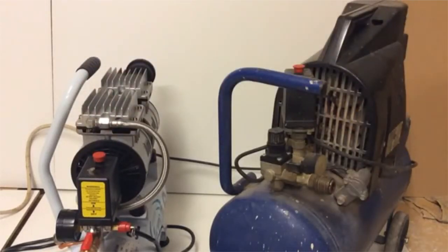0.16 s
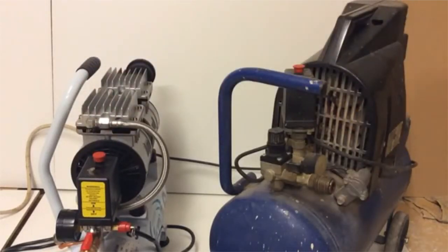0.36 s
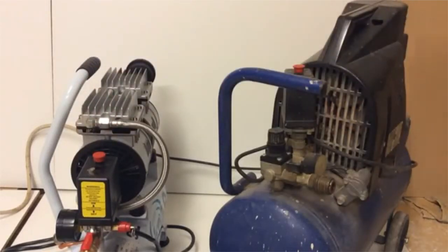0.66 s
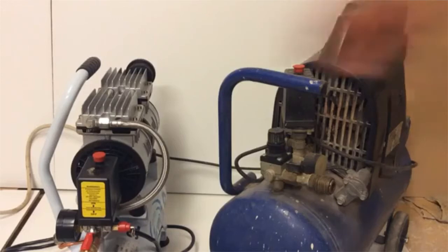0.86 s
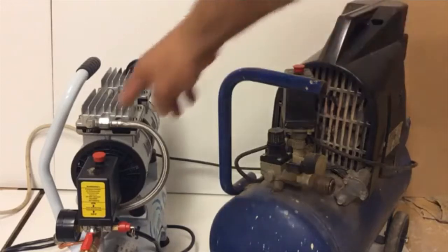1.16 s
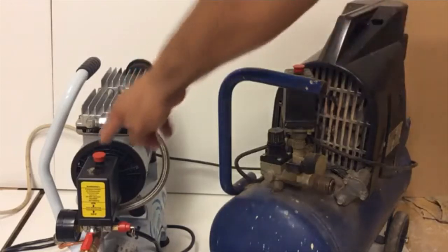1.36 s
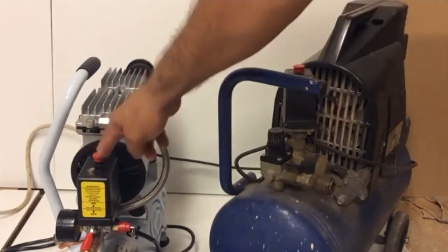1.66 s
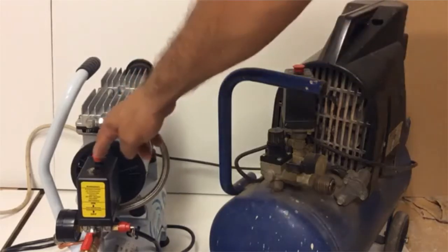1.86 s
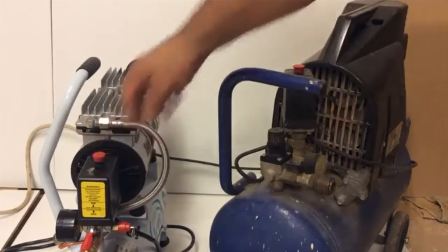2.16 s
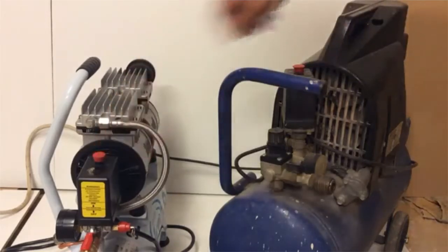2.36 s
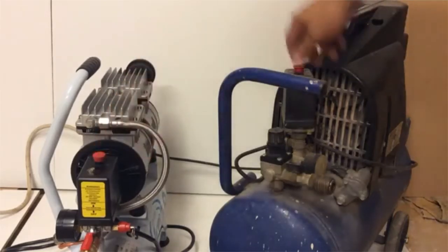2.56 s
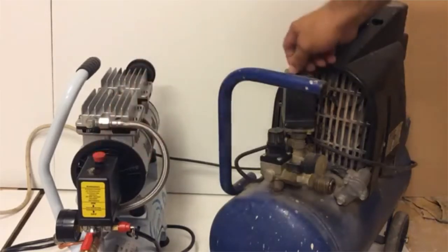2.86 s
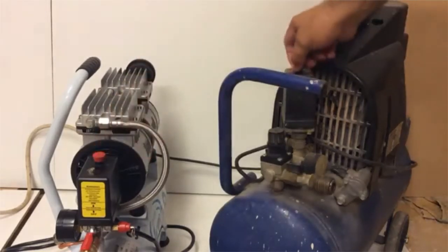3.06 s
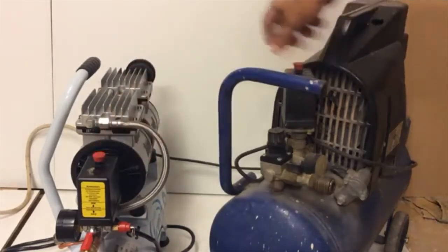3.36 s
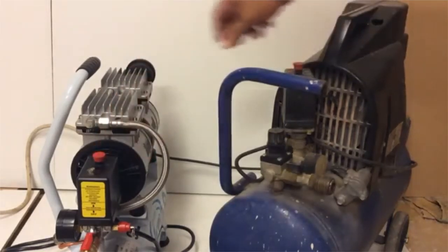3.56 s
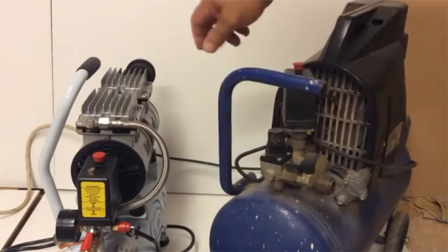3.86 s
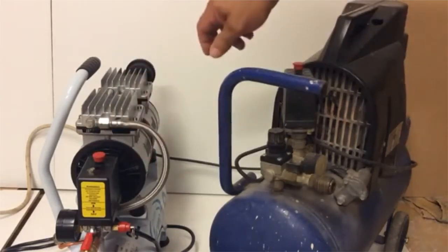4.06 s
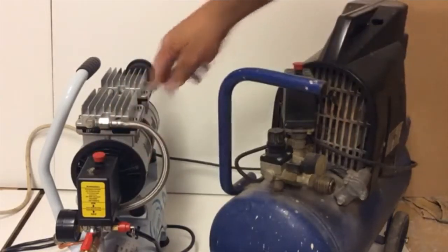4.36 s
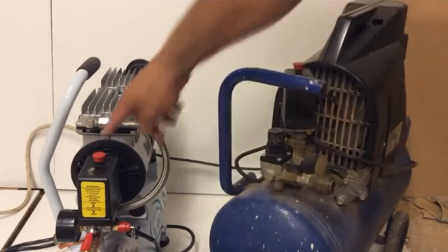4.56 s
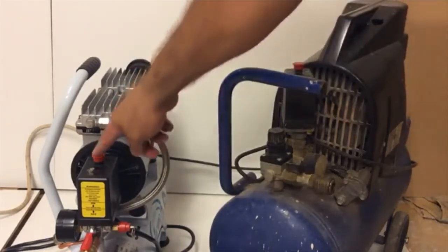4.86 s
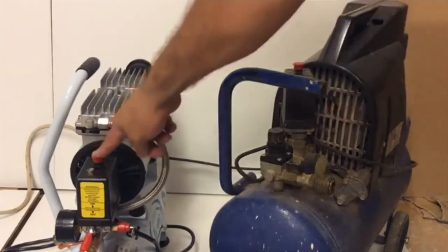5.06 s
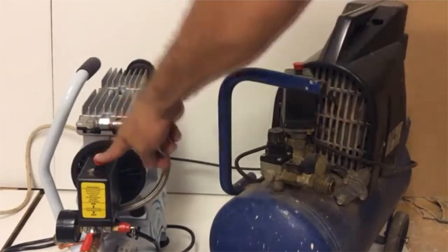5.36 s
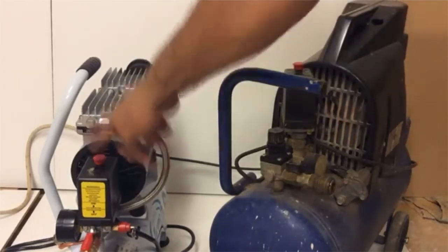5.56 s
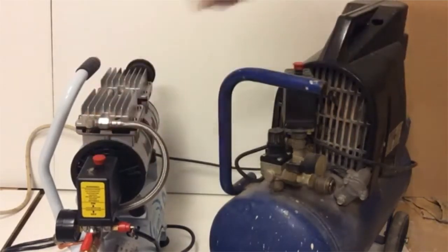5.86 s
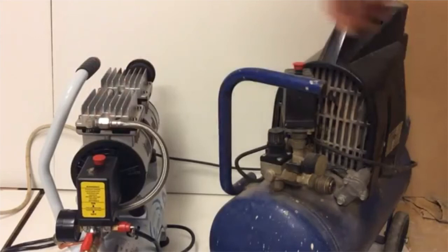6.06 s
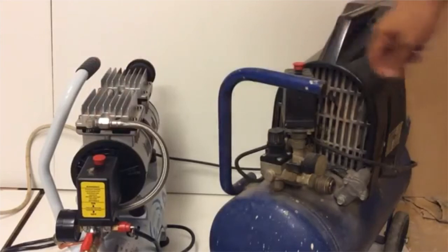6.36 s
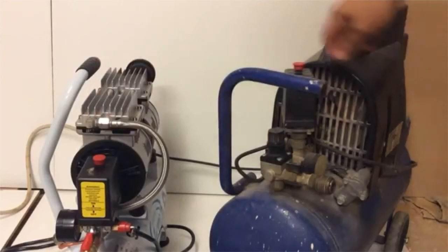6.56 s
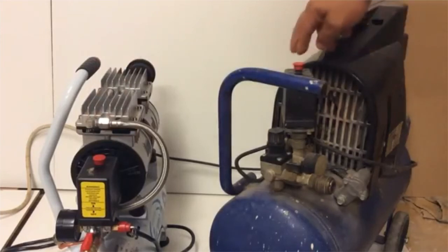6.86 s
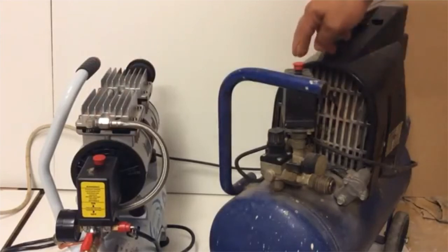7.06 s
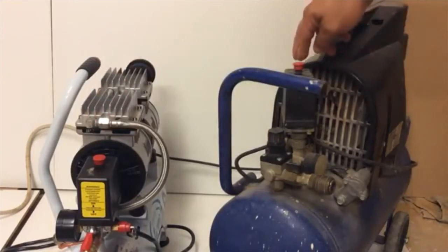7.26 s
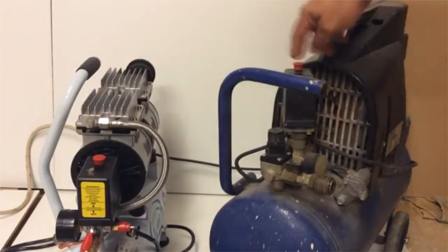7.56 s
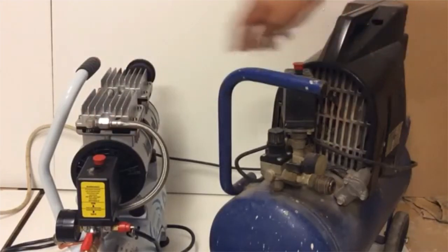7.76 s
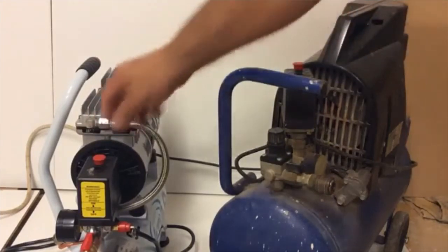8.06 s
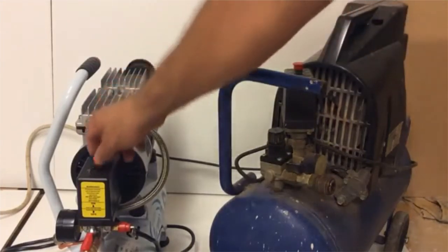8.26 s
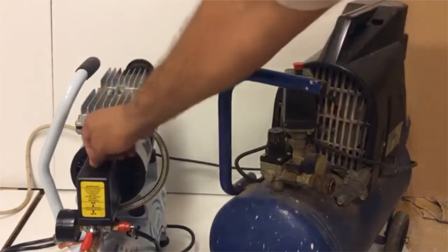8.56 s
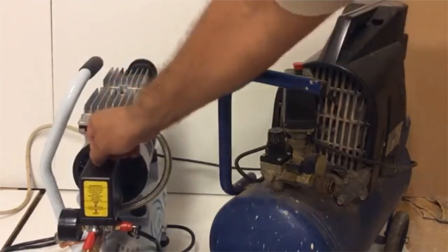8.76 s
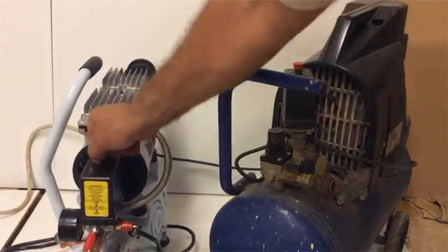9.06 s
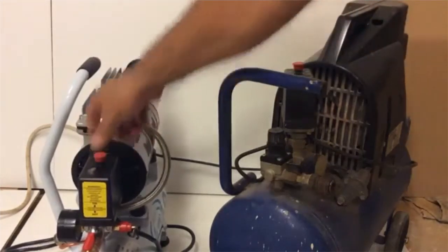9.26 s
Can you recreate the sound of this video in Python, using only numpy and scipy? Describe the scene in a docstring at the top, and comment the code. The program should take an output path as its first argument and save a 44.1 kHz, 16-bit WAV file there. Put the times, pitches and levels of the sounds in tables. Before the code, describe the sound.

Soft steady compressor chugging in a small room is overtaken by a much louder, faster piston compressor that starts with clanks and roars on.

```python
"""Two piston air compressors share a small room. A quiet twin-piston one chugs, built from shaft harmonics,
ticks, fan air and motor hum; the level of the whole sound steps up abruptly. A big one starts with clanks and
a chattering frame, surges and drones at twice the speed, with knocks, rattle and a burst of hiss every turn.
The quiet one is switched off under the din: it coasts down while its unloader valve lets out puffs of noise.
An arm moving over the machines recolours the big one's drone; near the end a switch gives a bright tick."""
import sys
import numpy as np
from scipy import signal
from scipy.fft import rfft, irfft, next_fast_len
from scipy.io import wavfile

SR = 44100
rng = np.random.default_rng(int(sys.argv[2]) if len(sys.argv) > 2 else 0)


def bounce(signal):
    """Save signal as a 16-bit WAV file at the path given by the first command-line argument."""
    frames = np.transpose(np.atleast_2d(signal))
    limited = np.clip(frames, -1, 1)
    pcm = np.round(limited * 32767).astype(np.int16)
    wavfile.write(sys.argv[1], SR, pcm)


N = 415422
TIME = np.arange(N) / SR  # s

# Knocks in each turn of the big pump: (crank angle [turns], ring [Hz], width [Hz], level [dB])
BIG_KNOCKS = [(-.08, 166, 120, 11), (.39, 355, 57, 3), (-0.15, 730, 180, -2), (.06, 958, 300, 4),
              (.05, 1444, 470, 2.5), (.42, 1514, 66, 0), (.05, 2170, 600, 1.5), (.62, 1860, 300, -8.5)]
# Shaft harmonics of the big pump that stand out: (multiple of the shaft rate, level [dB])
BIG_STANDOUTS = [(2, -8), (3, 2.5), (4, -2.5), (6, -9.5), (7, -1), (8, -3), (9, -4), (11, -11.5),
                 (13, -14.5), (15, -9), (16, -9), (22, -9.5), (31, -12), (32, -10)]
# Colour of its casing, which the other harmonics follow: (frequency [Hz], level [dB])
BIG_CASING = [(48, -39), (480, -17.5), (670, -28), (810, -13.5), (880, -14.5), (1020, -14), (1160, -19),
              (1220, -16), (1360, -14.5), (1450, -21.5), (1770, -27.5), (1900, -16), (2220, -20)]
# Colour of its loose rattle: (frequency [Hz], relative level per Hz [dB])
BIG_RATTLE = [(25, -31), (50, -16), (100, -14), (200, -2.5), (280, -9.5), (400, 3), (580, -6.5),
              (760, -3.5), (1500, -7), (1750, -10), (2100, -11.5), (2600, -11), (5000, -66)]
# Colour of its rushing air: (frequency [Hz], relative level per Hz [dB])
BIG_AIR = [(1120, -42), (1900, -5.5), (2050, -6.5), (2590, -7.5), (3510, -4), (4630, -5.5), (5750, -4.5),
           (6370, -6.5), (7190, -5.5), (7980, -8.5), (9160, -8.5), (10200, -13.5), (13300, -18),
           (14200, -19), (15000, -19)]
# Moves of the arm: (from [s], to [s], reach [1 = far across the small pump, below 0 = over the big pump])
ARM_REACHES = [(4.5, 5.9, 0.33), (5.95, 7.4, -0.28), (8.103, 9.6, 1)]
# Harmonics that the arm makes swell or fade by shifting the room's standing waves:
# (multiple of the shaft rate, change at full reach [dB])
STANDING_WAVES = [(6, 3), (9, 4.5), (11, -6.5), (15, 4.5), (16, 3), (17, -9), (19, 3), (20, -19), (21, -8),
                  (22, -4)]
# Clanks of the start: (time [s], level [dB], thud [Hz])
CLANKS = [(3.069, -13, 318), (3.108, -12, 280), (3.129, -18, 320), (3.164, -21, 290), (3.187, -21, 350),
          (3.211, -22, 410), (3.234, -22, 410)]
# Ringing modes of the frame: (frequency [Hz], level [dB], time to fall 60 dB [s])
FRAME_MODES = [(745, -19.5, .07), (820, -4, 0.04), (940, -4, 0.062), (1003, -6.5, 0.1), (1065, -12, 0.041),
               (1540, -21, 0.066), (2024, -8, 0.051), (2080, -10, 0.044), (3130, -10, 0.029)]
# Modes of the tank, which booms along with the shaking frame: (frequency [Hz], level [dB], 60 dB fall [s])
TANK_MODES = [(343, -6, 0.12), (413, -4, .11)]
# Shaft speed of the small pump, before any coasting: (time [s], speed [turns per s])
SMALL_SPEED = [(0, 24.02), (1.0, 24.02), (2.8, 23.95), (5.34, 23.9)]
# Its level, leaving out the step of the whole sound and the fade: (time [s], level [dB])
SMALL_LEVEL = [(0, -2.5), (1.0, -2), (2.8, -2), (5.34, -15)]
# Knocks in each of its turns: (crank angle [turns], ring [Hz], width [Hz], level [dB])
SMALL_KNOCKS = [(0, 110, 70, 2), (-.01, 225, 45, 0), (0, 850, 350, -6), (.01, 1510, 110, -3),
                (.48, 1510, 130, -7.5), (.46, 950, 300, -14), (0, 2500, 400, -14), (-.02, 4000, 3000, -13),
                (.45, 3500, 3000, -19)]
# Its shaft harmonics that stand out: (multiple of the shaft rate, level [dB])
SMALL_STANDOUTS = [(4, 4), (5, -0.5), (6, -1), (7, -6.5), (8, -13), (9, 5), (10, -1), (12, -8.5),
                   (18, -4.5), (22, -7), (29, -11), (31, -9), (48, -11), (52, -11)]
# Colour of its casing, which the other harmonics follow: (frequency [Hz], level [dB])
SMALL_CASING = [(24, -38), (72, -32), (345, -50), (410, -16), (620, -44), (790, -15.5), (1100, -27),
                (1370, -23), (1450, -6.5), (1550, -9.5), (1610, -16)]
# Colour of its fan air: (frequency [Hz], relative level per Hz [dB])
SMALL_AIR = [(30, -13), (90, 7), (150, 6), (220, 11), (340, 1.5), (620, -2), (1100, 0), (1520, -5),
             (1720, -3.5), (4000, -10.5), (10000, -12), (12000, -17), (15000, -22)]
# Surges of air from the unloader valve: (time [s], level [dB])
PUFFS = [(5.337, -19), (5.4, -20.5), (5.55, -29)]
# Colour of those puffs: (frequency [Hz], relative level per Hz [dB])
PUFF_COLOUR = [(800, -30), (2200, -1), (4000, 3.5), (8000, 4), (10500, -1), (13500, -6), (15000, -11)]
# Tick of the small pump's switch: (time [s], level [dB], ring [Hz], time to fall 60 dB [s])
SWITCH_TICK = (9.072, -17, 5650, .03)

# The big pump is switched on, and its valve first opens (s)
BIG_ON_S, FIRST_STROKE_S = 3.067, 3.108
# Its shaft starts SAG_HZ above KICK_HZ, runs up, then sags to BIG_HZ as the tank fills (turns per s)
KICK_HZ, BIG_HZ, SAG_HZ = 22, 48.355, .125
RUN_UP_S, SAG_S = .043, 2.2  # time constants
# Moments when each piston is at the top (s)
SMALL_TOP_S, BIG_TOP_S = 1.3868, 3.3159
# Drive and air flow grow with speed (dB per doubling) and overshoot at first (dB, time constant in s)
DRIVE_DB, DRIVE_DB_PER_OCTAVE, DRIVE_SURGE_DB, DRIVE_SURGE_S = -0.33, 32, 4, .25
FLOW_DB, FLOW_DB_PER_OCTAVE, FLOW_SURGE_DB, FLOW_SURGE_S = -24, 13, 5.5, 0.34
# The treble of the hiss builds last: above (Hz), held back at first by (dB), time constant (s)
FIZZ_HZ, FIZZ_LAG_DB, FIZZ_LAG_S = 9500, 8.5, 0.67
# Time taken by each arm move (s)
ARM_MOVE_S = .45
# Smaller movements make the harmonics drift (dB per octave above the shaft rate, changes per s)
DRIFT_DB_PER_OCTAVE, DRIFT_PER_S = 0.42, 1.293
# The frame shakes during the run-up
SHUDDER_DB, SHUDDER_ATTACK_S, SHUDDER_HOLD_S, SHUDDER_DB_PER_S = -20, .006, 0.14, 130
# The level of the whole sound steps up abruptly, while only the small pump is heard
STEP_S, STEP_DB = 2.828, 14.5
# The small pump is switched off, coasts (time constant) and fades
SMALL_OFF_S, COAST_S, COAST_DB_PER_S = 5.33, .45, 45
# Shape of each puff
PUFF_ATTACK_S, PUFF_HOLD_S, PUFF_DB_PER_S = .013, .025, 110
# Motor hum, and how far each motor's hum lags (cycles)
HUM_HZ, SMALL_LAG, BIG_LAG = 100, .06, .85
# Top edge of the sound (Hz)
EDGE_HZ = 15100


def big_pump():
    """One piston runs up, drones, knocks and rattles; its valve lets out a burst of hiss every turn."""
    age = since(BIG_ON_S)
    sag = SAG_HZ * np.exp(-age / SAG_S)
    speed = BIG_HZ + sag - (BIG_HZ - KICK_HZ) * np.exp(-age / RUN_UP_S)
    turns = crank(speed, BIG_TOP_S)
    octaves = np.log2(speed / BIG_HZ)
    drive_db = DRIVE_DB + DRIVE_DB_PER_OCTAVE * octaves + DRIVE_SURGE_DB * np.exp(-age / DRIVE_SURGE_S)
    flow_db = FLOW_DB + FLOW_DB_PER_OCTAVE * octaves + FLOW_SURGE_DB * np.exp(-age / FLOW_SURGE_S)

    orders = harmonics(BIG_STANDOUTS, BIG_CASING, BIG_HZ, uneven_db=3, count=46)
    tones = drone(turns, orders, BIG_KNOCKS, BIG_HZ, waver=.14, scatter=.9, swell=arm_swell)
    body = amp(-18.5) * tones * amp(0.52 * wander(48))  # no two strokes push alike
    clicks = clatter(turns, BIG_KNOCKS, above_hz=850, spread_db=3.5, loose=0.15)
    ticks = amp(-35.5) * room(clicks, wet_db=-2.5, t60=0.23)
    shaking = 1 + .5 * gate(turns, angle=0.11, rise=.04, fall=0.14)
    rattle = amp(-29.0) * noise(BIG_RATTLE) * evened(shaking)
    machine = (body + ticks + rattle + hum(-35.5, BIG_LAG)) * amp(drive_db)

    valve = 1 + 1.15 * gate(turns, angle=-0.066, rise=0.19, fall=0.12) * amp(2.7 * wander(60))
    air = noise(BIG_AIR, ripple_db=1.3)
    dull = lowpass(air, FIZZ_HZ)
    fizz = (air - dull) * amp(-FIZZ_LAG_DB * np.exp(-age / FIZZ_LAG_S))
    bursts = room((dull + fizz) * evened(valve), wet_db=-8.5, t60=0.16)
    hiss = bursts * amp(flow_db + 0.68 * wander(10))
    return (TIME > BIG_ON_S) * machine + (TIME > FIRST_STROKE_S) * hiss


def arm_swell(k):
    """An arm shifts the standing waves: gain over time of the big pump's harmonic k."""
    shift_db = sum(db for multiple, db in STANDING_WAVES if round(multiple) == k)
    drift_db = DRIFT_DB_PER_OCTAVE * np.log2(k) * wander(DRIFT_PER_S)
    if not shift_db:
        return amp(drift_db)
    reach = np.zeros(N)
    for start_s, end_s, far in ARM_REACHES:
        inside_s = np.minimum(TIME - start_s, end_s - TIME)
        reach += far * np.clip(.5 + inside_s / ARM_MOVE_S, 0, 1)
    return amp(shift_db * reach + drift_db)


def start_clanks():
    """The first slow strokes jolt the tank with a thud, ring the frame and crack briefly."""
    t, out = np.arange(SR // 3) / SR, np.zeros(N)
    for start_s, db, thud_hz in CLANKS:
        thud = amp(4.0 - 60 * t / 0.13) * np.sin(2 * np.pi * thud_hz * t)
        ring = np.zeros(len(t))
        for hz, mode_db, t60 in FRAME_MODES:
            struck_hz = hz * (1 + 0.018 * rng.standard_normal())  # each clank rings a little differently
            ring += amp(mode_db - 60 * t / t60) * np.sin(2 * np.pi * struck_hz * t + 2 * np.pi * rng.random())
        crack = amp(-2.5 - 60 * t / 0.19) * lowpass(rng.standard_normal(len(t)), hz=6460)
        out[round(start_s * SR):][:len(t)] += amp(db) * (thud + ring + crack)
    return room(tank(out), wet_db=-9, t60=.25)


def shudder():
    """Loose parts chatter against the frame during the run-up and keep its modes ringing."""
    t = np.arange(SR // 8) / SR
    ring = sum(amp(db - 60 * t / t60) * np.sin(2 * np.pi * hz * t) for hz, db, t60 in FRAME_MODES + TANK_MODES)
    taps = rng.standard_normal(N) * (rng.random(N) < 500 / SR)  # about 500 random taps per s
    chatter = evened(tank(signal.oaconvolve(taps, ring)[:N]))
    return chatter * amp(SHUDDER_DB) * burst(BIG_ON_S, SHUDDER_ATTACK_S, SHUDDER_HOLD_S, SHUDDER_DB_PER_S)


def small_pump():
    """Two pistons, one louder than the other, chug and tick over soft fan air, then coast down."""
    coasting = since(SMALL_OFF_S)
    speed_hz = SMALL_SPEED[0][1]
    turns = crank(curve(SMALL_SPEED) * np.exp(-coasting / COAST_S), SMALL_TOP_S)
    orders = harmonics(SMALL_STANDOUTS, SMALL_CASING, speed_hz, uneven_db=5, count=67)
    tones = drone(turns, orders, SMALL_KNOCKS, speed_hz, waver=.09, scatter=.25)
    body = amp(-43.5) * tones * amp(.5 * wander(23.66))
    clicks = clatter(turns, SMALL_KNOCKS, above_hz=1800, spread_db=1.8, loose=.08)
    ticks = amp(-60) * room(clicks, wet_db=-4, t60=.2)
    pulsing = 1 + 0.49 * gate(2 * turns, angle=.03, rise=.06, fall=.4)  # twice a turn
    air = amp(-48.0) * noise(SMALL_AIR, ripple_db=2) * evened(pulsing)
    machine = body + ticks + air + hum(-54.5, SMALL_LAG)
    return machine * amp(curve(SMALL_LEVEL) - COAST_DB_PER_S * coasting)


def unloader():
    """The small pump's switch vents the air left in its line, in uneven surges of noise."""
    power = np.zeros(N)
    for start_s, db in PUFFS:
        power += (amp(db) * burst(start_s, PUFF_ATTACK_S, PUFF_HOLD_S, PUFF_DB_PER_S)) ** 2
    return noise(PUFF_COLOUR) * np.sqrt(power) * amp(1.2 * wander(35))


def switch_tick():
    """A finger flicks the small pump's switch: one short, bright, roughened ring."""
    start_s, db, hz, t60 = SWITCH_TICK
    t = since(start_s)
    return amp(db - 60 * t / t60) * np.sin(2 * np.pi * hz * t) * (1 + .6 * rng.standard_normal(N))


def drone(turns, orders, knocks, speed_hz, waver, scatter, swell=lambda k: 1):
    """Shaft harmonics, timed within the turn by the knocks that ring them; walls scatter the high ones."""
    angle, ring_hz, width, db = np.transpose(knocks)
    out, power = np.zeros(N), 0
    for k, level_db in orders:
        # how all the knocks together answer this harmonic; only its phase is used
        resonance = width / 2 + 1j * (k * speed_hz - ring_hz)
        answer = np.sum(amp(db) * np.exp(-2j * np.pi * k * angle) / resonance)
        phase = np.angle(answer) + scatter * k / len(orders) * rng.standard_normal()
        line = np.cos((2 * np.pi * (k * turns % 1) + phase).astype(np.float32))
        out += amp(level_db) * swell(k) * (1 + waver * wander(7)) * line
        power += amp(level_db) ** 2 / 2
    return out / np.sqrt(power)


def harmonics(standouts, casing, speed_hz, uneven_db, count):
    """Rows (multiple, dB): a few stand out, the rest lie unevenly about the casing's colour."""
    hz, db = np.transpose(casing)
    multiples = np.arange(count) + 1
    levels = np.interp(np.log(multiples * speed_hz), np.log(hz), db) + uneven_db * rng.standard_normal(count)
    strong = {round(k): level_db for k, level_db in standouts}
    return [(k, strong.get(k, level_db)) for k, level_db in zip(multiples, levels)]


def clatter(turns, knocks, above_hz, spread_db, loose):
    """The bright knocks: each rings the casing, partly alike and partly anew on every turn."""
    t, out = np.arange(2048) / SR, np.zeros(N)
    for angle, hz, width, db in knocks:
        if hz > above_hz:
            clicks = strokes(turns, angle, spread_db)
            fading = signal.lfilter([1], [1, -np.exp(-1 / (0.0053 * SR))], clicks)  # time constant 5.3 ms
            scatter = fading * rng.standard_normal(N)
            ring = np.exp(-np.pi * width * t) * np.sin(2 * np.pi * hz * t)
            out += amp(db) * evened(signal.oaconvolve(clicks + loose * scatter, ring)[:N])
    return evened(out)


def strokes(turns, angle, spread_db):
    """One click a turn at a crank angle, each of slightly different strength."""
    at = np.flatnonzero(np.diff(np.floor(turns - angle)) > 0)
    clicks = np.zeros(N)
    clicks[at] = amp(spread_db * rng.standard_normal(1000)[:len(at)])
    return clicks


def crank(speed, top_s):
    """Turns of the shaft, a whole number when the piston is at the top."""
    turns = np.cumsum(speed) / SR
    return turns - np.interp(top_s, TIME, turns)


def gate(turns, angle, rise, fall):
    """A swell and a fall once per count of turns, peaking at the angle (rise and fall in turns)."""
    past = (turns - angle) % 1
    return np.exp(-past / fall) + np.exp((past - 1) / rise)


def hum(level_db, lag):
    """Motor iron hums at twice the mains rate and beats against the slipping shaft; lag in cycles."""
    return amp(level_db) * np.sqrt(2) * np.cos(2 * np.pi * (HUM_HZ * TIME - lag))


def noise(spectrum, ripple_db=0):
    """Noise of rms 1 with the given colour; many casing resonances ripple it."""
    hz, db = np.transpose(spectrum)
    size = next_fast_len(N)
    f = np.fft.rfftfreq(size, 1 / SR)
    ripple = np.interp(f, np.linspace(0, SR / 2, num=220), rng.standard_normal(220))
    gain = amp(np.interp(np.log(f + 1), np.log(hz + 1), db) + ripple_db * ripple)
    return evened(irfft(rfft(rng.standard_normal(size)) * gain, size)[:N])


def room(x, wet_db, t60):
    """Close walls add a short tail of sparse reflections that falls 60 dB in t60 seconds."""
    t = np.arange(SR // 3) / SR
    sparse = (rng.random(len(t)) < 2000 / SR) * (t > .003)  # about 2000 per s, none in the first 3 ms
    taps = rng.standard_normal(len(t)) * sparse * amp(-60 * t / t60)
    tail = signal.oaconvolve(x, taps / np.linalg.norm(taps))[:N]
    return (x + amp(wet_db) * tail) / np.hypot(1, amp(wet_db))


def tank(x):
    """A small tank radiates no deep bass."""
    return signal.sosfilt(signal.butter(2, 150, "high", fs=SR, output="sos"), x)


def lowpass(x, hz):
    """Takes off the treble above hz."""
    return signal.sosfiltfilt(signal.butter(2, min(hz, .45 * SR), fs=SR, output="sos"), x)


def burst(start_s, attack_s, hold_s, fall_db_per_s):
    """Gain that rises, holds and dies away."""
    rise = np.minimum(since(start_s) / attack_s, 1)
    return rise * amp(-fall_db_per_s * since(start_s + attack_s + hold_s))


def since(start_s):
    """Seconds since a moment, zero before it."""
    return np.maximum(TIME - start_s, 0)


def wander(per_s):
    """Random values, per_s of them each second, joined by straight lines."""
    return np.interp(TIME * per_s, np.arange(2000), rng.standard_normal(2000))


def curve(rows):
    """Rows (time in s, value) joined by straight lines."""
    return np.interp(TIME, *np.transpose(rows))


def evened(x):
    """Scaled to rms 1."""
    return x / np.sqrt(np.mean(x ** 2) + 1e-20)


def amp(db):
    """Decibels to gain."""
    return 10 ** (np.asarray(db) / 20)


def scene():
    """Both machines; the level of the whole sound steps up abruptly just before the big one starts."""
    step = amp(STEP_DB * (TIME > STEP_S))
    big = big_pump() + start_clanks() + shudder()
    # only the small pump sounds before the step; all other levels are those after it
    small = step * small_pump() + unloader() + switch_tick()
    return (big + small)[None]


def record(dry):
    """The highest peaks are rounded off; then a filter takes away what lies above EDGE_HZ."""
    rounded = dry / (1 + (dry / .85) ** 6) ** (1 / 6)
    band_limit = signal.firwin(511, EDGE_HZ, window=("kaiser", 9), fs=SR)
    return signal.oaconvolve(rounded, band_limit[None], "same")


dry = scene()
out = record(dry)
bounce(out)
```